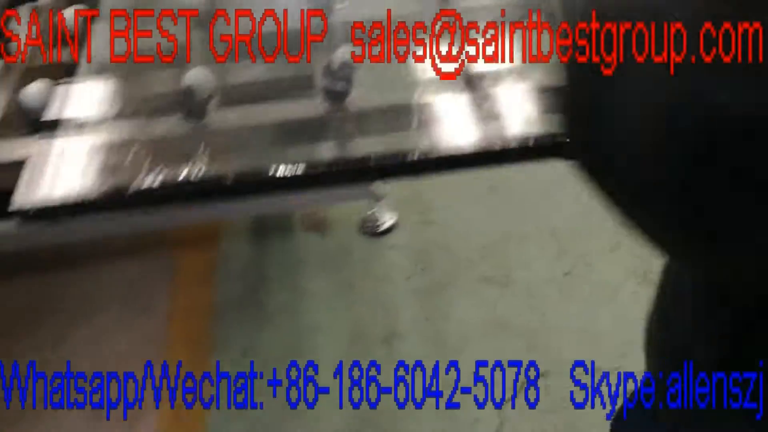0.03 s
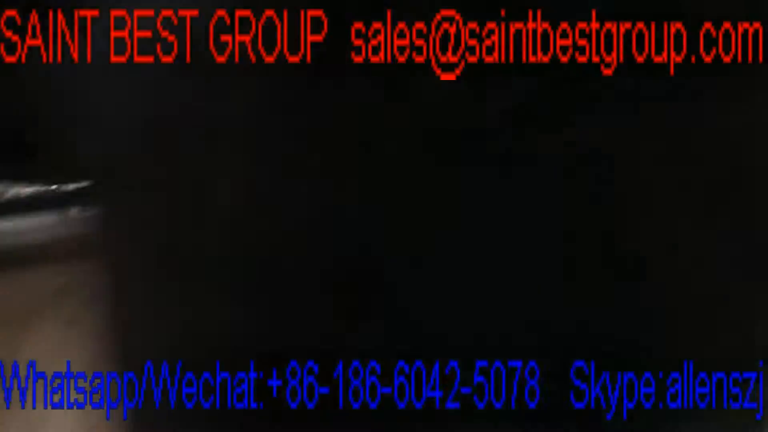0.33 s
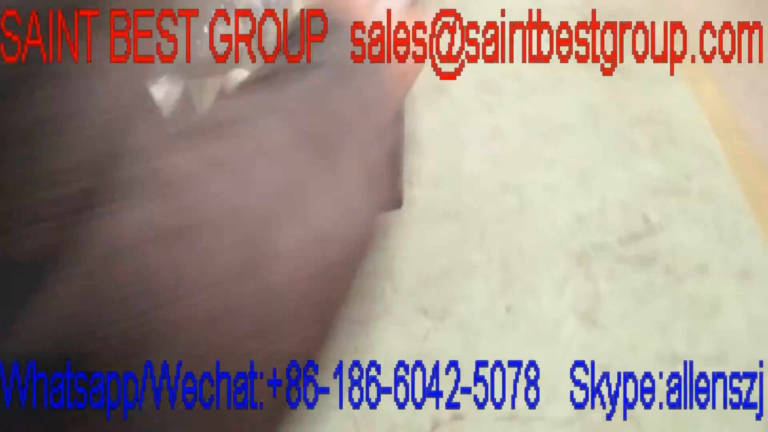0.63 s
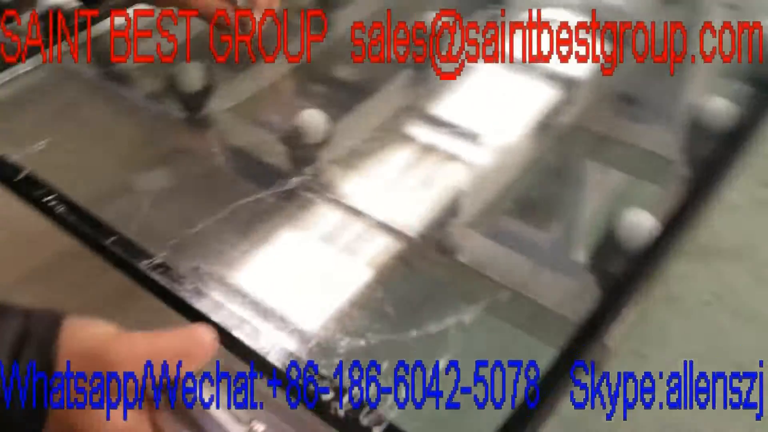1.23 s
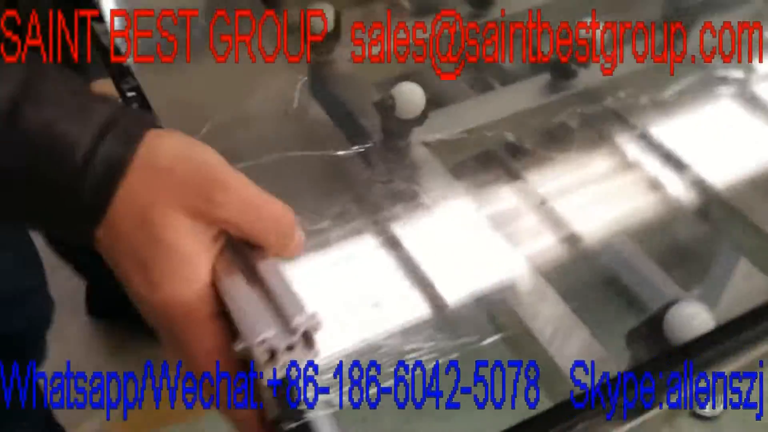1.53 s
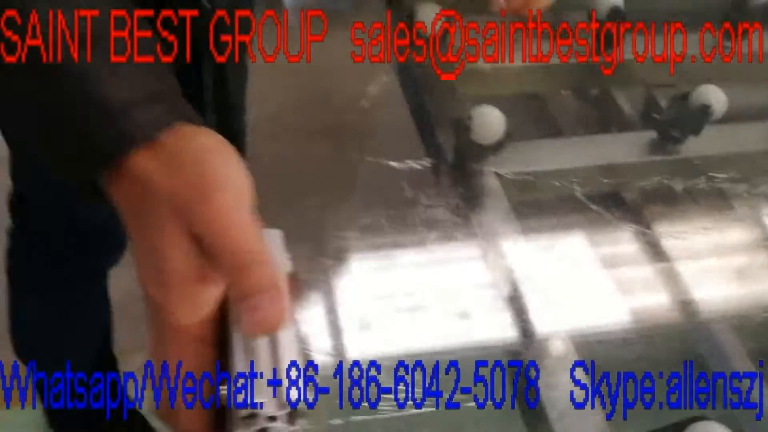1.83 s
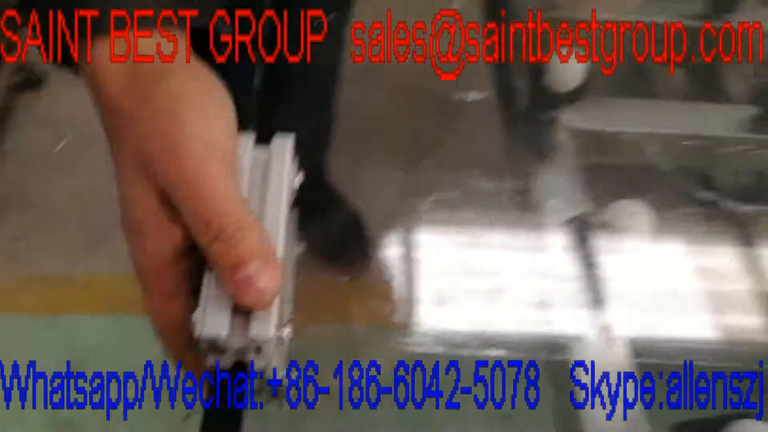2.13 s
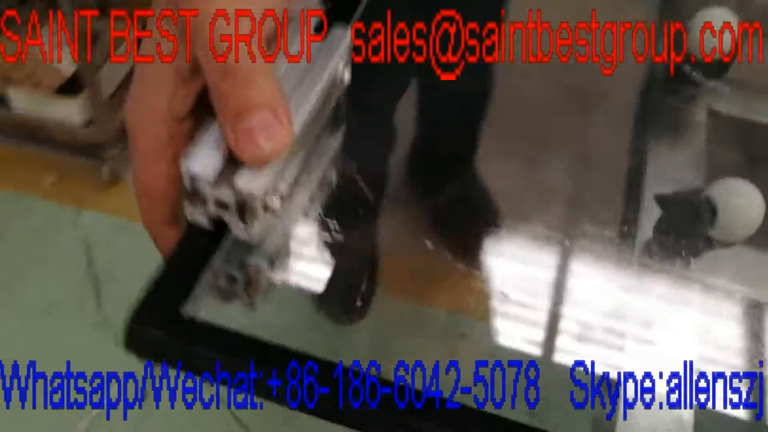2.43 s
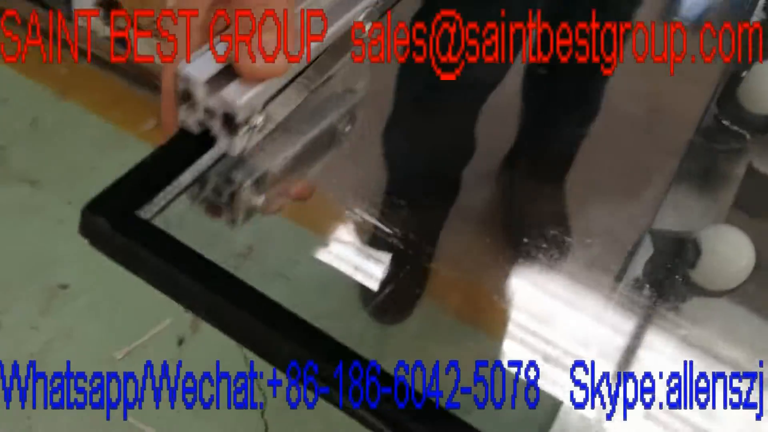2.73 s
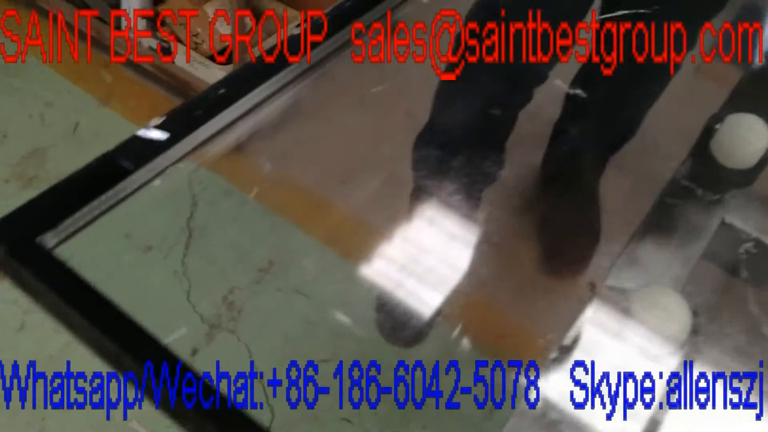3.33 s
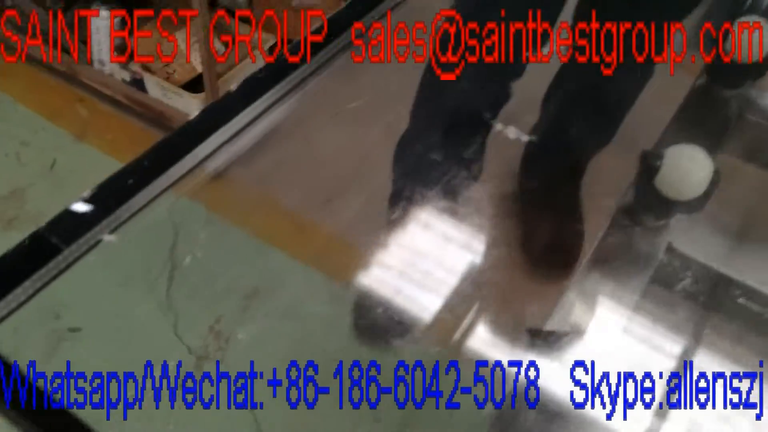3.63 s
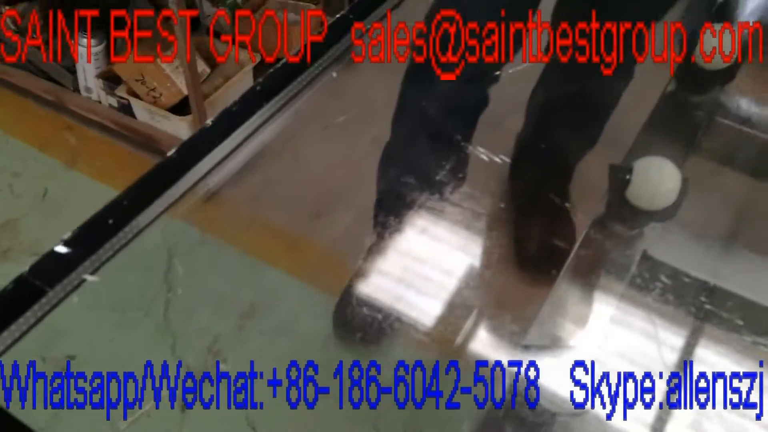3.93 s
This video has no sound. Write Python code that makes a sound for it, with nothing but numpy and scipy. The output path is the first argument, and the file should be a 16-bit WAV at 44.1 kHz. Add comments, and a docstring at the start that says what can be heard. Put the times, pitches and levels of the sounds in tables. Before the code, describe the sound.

Sharp clacks and a gritty slide of an aluminium bar on glass in a large hall.

```python
"""Aluminium bar on a glass pane

A short aluminium bar is handled on a framed glass pane lying on a table in a large, quiet workshop.
A machine drones, metal clinks far off and a sleeve brushes past. The bar clacks onto the glass, making
the pane thud, then scuffs and slides along the edge, squeaking and catching on grit. It comes off
with a loud double clack that rings through the hall."""
import sys
import numpy as np
from scipy import signal
from scipy.fft import rfft, irfft, next_fast_len
from scipy.io import wavfile

SR = 44100
rng = np.random.default_rng(int(sys.argv[2]) if len(sys.argv) > 2 else 0)


def dump(signal):
    """Clip the signal to [-1, 1] and save it as 16-bit WAV at the path in sys.argv[1]."""
    limited = np.clip(np.atleast_2d(signal).T, -1, 1)
    pcm = np.round(limited * 32767).astype(np.int16)
    wavfile.write(sys.argv[1], SR, pcm)


N = 176400
T = np.arange(N) / SR
SIDES = np.array([[1], [-1]])  # left, right

# tone colour of the bar chattering on glass: (frequency [Hz], level [dB])
CHATTER_COLOUR = [(400, -16), (720, -10), (1150, -2), (2100, 2.5), (4000, -5.5), (5300, 1), (6600, -1.5),
                  (8300, 0.5), (10700, -13.5), (13000, -11.5), (15800, -23.5)]
# which side the sound of the hall leans to: (frequency [Hz], left minus right [dB])
HALL_LEAN = [(400, 3.5), (1000, -7), (2200, -5.5), (4000, -1), (8000, 6.5), (13000, -13)]
# how alike both ears hear nearby noise: (frequency [Hz], likeness [0 to 1])
NEAR_EAR_LIKENESS = [(200, 1), (800, 0.39), (2000, 0.15)]
# how alike both ears hear distant noise: (frequency [Hz], likeness [0 to 1])
FAR_EAR_LIKENESS = [(100, .97), (300, 0.92), (800, 0)]


def from_db(db):
    """Turns decibels into a factor to multiply a sound by."""
    return 10 ** (np.asarray(db) / 20)


def rms_one(x):
    """Scales a sound to an average power of one."""
    return x / np.sqrt(np.mean(x ** 2) + 1e-20)


def at_hz(points, hz):
    """Reads a table of (frequency, value) between its rows."""
    frequencies, values = np.transpose(points)
    return np.interp(np.log(hz + 1), np.log(frequencies), values)


def level(curve):
    """Strength that follows a table of (time, level), silent outside it."""
    s, db = np.transpose(curve)
    return from_db(np.interp(T, s, db)) * (T >= s[0]) * (T <= s[-1])


def fade(t, t60_s):
    """Full strength until t = 0, then a drop of 60 dB every t60_s seconds."""
    return from_db(-60 * np.maximum(t, 0) / t60_s)


def wander(changes_per_s):
    """A random line that takes a new value so many times a second."""
    return np.interp(T * changes_per_s, np.arange(4000), rng.standard_normal(4000))


def bell(hz, centre_hz, width_hz):
    """How strongly a resonance answers each frequency: most at its centre."""
    return 1 / np.sqrt(1 + (2 * (hz - centre_hz) / width_hz) ** 2)


def add(out, s, x):
    """Mixes x into out, starting at s seconds."""
    start = int(s * SR)
    out[:, start:start + x.shape[1]] += x[:, :N - start]


def shape(x, db_at):
    """Turns each frequency up or down by db_at(Hz), with no ringing ahead of a hit (minimum phase)."""
    n = 2 * next_fast_len(x.shape[-1] * 3 // 5)
    gains = from_db(db_at(np.fft.rfftfreq(n, 1 / SR)))
    cepstrum = irfft(np.log(gains), n)
    # keeping only the first half makes the filter respond after the sound, never before
    response = np.exp(rfft(2 * cepstrum[..., :n // 2], n) - cepstrum[..., :1])
    return irfft(rfft(x, n) * response, n)[..., :x.shape[-1]]


def colour(x, spectrum, extra_db=lambda hz: 0):
    """Gives white noise a tone colour and keeps its power."""
    return shape(x, lambda hz: 20 * np.log10(rms_one(from_db(at_hz(spectrum, hz) + extra_db(hz)))))


def place(x, lean):
    """Leans each frequency to the left or right."""
    return shape(x, lambda hz: at_hz(lean, hz) * SIDES / 2)


def noise(likeness, size=N):
    """White stereo noise whose two sides are most alike in the bass."""
    common, opposite = rfft(rng.standard_normal((2, size)))
    alike = np.clip(at_hz(likeness, np.fft.rfftfreq(size, 1 / SR)), -.99, .99)
    return irfft(np.sqrt(1 + alike) * common + np.sqrt(1 - alike) * opposite * SIDES, size)


def narrow_noise(centre_hz, width_hz):
    """Steady, distant noise gathered around one pitch."""
    resonance = bell(np.fft.rfftfreq(N, 1 / SR), centre_hz, width_hz) ** 2
    return rms_one(irfft(rfft(noise(FAR_EAR_LIKENESS)) * resonance, N))


def friction(grain_db, grains_per_s):
    """Noise whose strength jumps from one tiny slip to the next."""
    slip_number = np.cumsum(rng.random(N) < grains_per_s / SR)
    hiss = noise(NEAR_EAR_LIKENESS)
    strengths = from_db(grain_db * rng.standard_normal(N + 1))
    return rms_one(hiss * strengths[slip_number])


def patchy(x, depth_db, changes_per_s):
    """Each band of frequencies swells and fades on its own as the contact shifts."""
    hz, spectrum = np.fft.rfftfreq(N, 1 / SR), rfft(x)
    edges = [0, *np.geomspace(500, 16000, 16), SR]
    bands = (irfft(spectrum * (hz >= lo) * (hz < hi), N) for lo, hi in zip(edges, edges[1:]))
    return rms_one(sum(band * from_db(depth_db * wander(changes_per_s)) for band in bands))


def burst(rise_s, hold_s, t60_s, touches_per_s=2200, uneven_db=4.5):
    """Many tiny, uneven touches make a noise that rises fast and fades after hold_s."""
    t = T[:SR // 2]
    touch_number = np.cumsum(rng.random(len(t)) < touches_per_s / SR)
    strengths = from_db(uneven_db * np.clip(rng.standard_normal(len(t) + 1), -2, 2))
    chatter = noise(NEAR_EAR_LIKENESS, size=len(t)) * rms_one(strengths[touch_number])
    return chatter * np.minimum(t / rise_s, 1) * fade(t - hold_s, t60_s)


def ping(hz, t60_s):
    """One fading tone that swells over its first cycle, the same at both ears."""
    t = T[:SR // 2]
    tone = np.sin(2 * np.pi * hz * t) * np.minimum(t * hz, 1) * fade(t, t60_s)
    return np.tile(tone, (2, 1))


def ring(tones, t60_s, phase_spread, detune_share=0, rise_s=0.004):
    """A struck object rings with its natural tones, a little differently on each blow and at each ear."""
    t = T[:SR // 2]
    out = 0
    for hz, db in tones:
        strength = from_db(db + rng.normal())
        tuned_hz = hz * (1 + detune_share * rng.normal())
        ear_phases = phase_spread * rng.normal(size=(2, 1))
        out = out + strength * np.sin(2 * np.pi * tuned_hz * t + ear_phases)
    return out * np.minimum(t / rise_s, 1) * fade(t, t60_s)


def background():
    """The soft rush of air, a droning machine and metal clinking far off."""
    # tone colour of the air: (frequency [Hz], level [dB])
    air_colour = [(25, -1), (100, 1), (260, 7.5), (450, -5.5), (1700, -1.5), (3000, -33), (6500, -13.5),
                  (8400, -7), (10600, -15), (15500, -22)]
    # loudness of the machine: (time [s], level [dB])
    drone_levels = [(0, -62.5), (.45, -52), (.8, -68.5), (4, -69.5)]
    # distant clinks: (time [s], pitch [Hz], level [dB])
    clinks = [(.06, 2070, -48.5), (0.162, 2254, -42.5)]
    out = from_db(-60.5) * colour(noise(FAR_EAR_LIKENESS), air_colour)
    out += level(drone_levels) * narrow_noise(centre_hz=229.7, width_hz=5.1)
    for s, hz, db in clinks:
        metal = place(narrow_noise(hz, width_hz=220), HALL_LEAN)
        out += from_db(db) * fade(T - s, t60_s=0.37) * (T >= s) * metal
    return out


def hall(x, build_s=0.0037):
    """The hall's echoes blur into a tail that builds up quickly and lasts longest near 250 Hz."""
    # how long the echo lasts: (frequency [Hz], time to fade by 60 dB [s])
    fade_times = [(100, 0.38), (250, 2.1), (1000, 0.75), (4000, 1.1), (5500, 0.61), (8000, 0.65),
                  (15000, 0.49)]
    # tone colour of the echo: (frequency [Hz], level [dB])
    echo_colour = [(350, -7.5), (700, -2), (1400, -3), (2100, 0.5), (2600, -2.5), (3100, -1), (4000, -2),
                   (5000, -8.5), (8000, -8), (14000, -7.5)]
    t, hz = T[:SR], np.fft.rfftfreq(SR, 1 / SR)
    spectrum = rfft(noise(FAR_EAR_LIKENESS, size=SR))
    edges = np.geomspace(40, 18000, 17)
    tail = 0
    for lo, hi in zip(edges, edges[1:]):
        band = irfft(spectrum * (hz >= lo) * (hz < hi), SR)
        tail = tail + band * fade(t, at_hz(fade_times, np.sqrt(lo * hi)))
    tail = rms_one(tail * (1 - np.exp(-t / build_s))) / np.sqrt(SR)
    tail = shape(tail, lambda f: at_hz(echo_colour, f))
    return place(signal.fftconvolve(x, tail, axes=1)[:, :N], HALL_LEAN)


def sleeve():
    """Cloth brushes past with a fine-grained hiss whose colour keeps shifting."""
    # rise and fall of the brushing: (time [s], level [dB])
    brush_levels = [(0, -65.5), (.33, -59), (.39, -45.5), (.5, -48), (.59, -38), (.635, -40.5), (.695, -36),
                    (.73, -46.5), (.87, -54.5), (1.0, -51), (1.07, -102), (1.35, -52.5), (1.55, -59),
                    (1.95, -66), (2.07, -56.5), (2.16, -64.5)]
    # tone colour of the cloth: (frequency [Hz], level [dB])
    cloth_colour = [(30, -33), (80, -9), (250, -9), (440, -17.5), (1000, -9.5), (1700, -3.5), (6500, -8.5),
                    (8200, -4.5), (10200, -14.5), (13000, -14.5), (15500, -33)]
    hiss = patchy(friction(grain_db=2.16, grains_per_s=500), depth_db=3.0, changes_per_s=25.7)
    return colour(hiss * level(brush_levels), cloth_colour)


def knocks():
    """Dull knocks on the frame and table each ring briefly at the pitch of the spot that is hit; two low, brief
    tones also open the rubbing along the edge."""
    # the knocks, then two low tones as the rubbing starts: (time [s], pitch [Hz], level [dB], time to fade by
    # 60 dB [s])
    blows = [(0.607, 265, -27.5, 0.072), (0.895, 980, -35, 0.034), (.947, 850, -29, 0.016),
             (2.161, 1235, -40, 0.023), (2.535, 485, -44, 0.1), (2.571, 750, -38.5, 0.034)]
    out = np.zeros((2, N))
    for s, hz, db, t60_s in blows:
        add(out, s, from_db(db) * ping(hz, t60_s))
    return out


def thuds():
    """The pane is pushed onto its supports: its low tones ring and the table bumps."""
    # pushes on the pane: (time [s], level [dB])
    pushes = [(0.601, -42), (0.949, -38.5), (1.007, -46), (1.404, -41.5), (1.676, -36), (3.305, -43),
              (3.342, -37.5)]
    # low natural tones of the pane: (frequency [Hz], level [dB])
    pane_tones = [(88, -7.5), (152, -4.5), (188, 5.5), (238, -5.5), (290, -18)]
    # tone colour of the table's bump: (frequency [Hz], level [dB])
    bump_colour = [(25, -55), (70, -28.5), (170, 0.5), (300, -2.5), (600, -7.5), (1500, -29.5)]
    out = np.zeros((2, N))
    for s, db in pushes:
        bump = from_db(-11.5) * colour(burst(rise_s=0.004, hold_s=0.0043, t60_s=0.38), bump_colour)
        pane = ring(pane_tones, t60_s=0.24, phase_spread=0.074)
        add(out, s, from_db(db) * (pane + bump))
    return out


def rattles():
    """The bar rocks on the pane with a light chatter, each time around a different pitch."""
    # rocking movements: (time [s], centre pitch [Hz], level [dB])
    rocks = [(1.15, 1900, -31.5), (1.482, 1690, -40.5), (1.553, 1150, -41.5), (1.836, 1850, -39)]
    out = np.zeros((2, N))
    for s, centre_hz, db in rocks:
        resonance_db = lambda hz: 20 * np.log10(bell(hz, centre_hz, width_hz=centre_hz))
        chatter = burst(rise_s=0.0014, hold_s=0.0073, t60_s=0.04)
        add(out, s, from_db(db) * colour(chatter, CHATTER_COLOUR, resonance_db))
    return out


def squeaks(waver_share=0.04, rough_db=4, wavers_per_s=500):
    """The bar sticks and slips, making short, scratchy notes unsteady in pitch and strength."""
    # the squeaks: (time of the middle [s], pitch [Hz], level [dB], length [s])
    notes = [(.382, 3220, -41, 0.017), (0.431, 3294, -34.5, 0.0091), (0.901, 5330, -27, 0.0018),
             (1.341, 5270, -33.5, 0.015), (1.367, 1860, -46, 0.032), (2.517, 1694, -40.5, 0.03),
             (2.725, 1200, -39.5, 0.053), (3.208, 5320, -43.5, 0.019), (3.963, 1477, -39.5, 0.014)]
    out = 0
    for s, hz, db, length_s in notes:
        cycles = np.cumsum(hz * (1 + waver_share * wander(wavers_per_s))) / SR
        note = np.sin(2 * np.pi * cycles) * from_db(rough_db * wander(wavers_per_s))
        swell = np.exp(-2 * ((T - s) / length_s) ** 2)
        out = out + from_db(db) * swell * rms_one(note)
    return out


def slide():
    """The bar scuffs, then rubs along the edge, catching on grit and snapping free."""
    # rise and fall of the rubbing: (time [s], level [dB])
    rub_levels = [(2.33, -44), (2.42, -49.5), (2.52, -38), (2.62, -38), (2.85, -36), (3.0, -35.5),
                  (3.12, -36.5), (3.17, -44), (3.25, -62)]
    # tone colour of the rubbing: (frequency [Hz], level [dB])
    rub_colour = [(100, -27), (400, -8.5), (900, 0.5), (1700, 2.5), (2300, 0.5), (4000, -4), (8600, -2.5),
                  (10000, -16.5), (13000, -16), (16000, -39)]
    # narrow pitches that the rubbing sets ringing: (frequency [Hz], width [Hz], boost [dB])
    resonances = [(3250, 61, 4), (5050, 160, 5.5), (7370, 120, 13), (8670, 130, 3)]
    # rise and fall of the opening scuff: (time [s], level [dB])
    scuff_levels = [(2.225, -51), (2.25, -46.5), (2.262, -32.5), (2.285, -27.5), (2.315, -34),
                    (2.345, -40.5), (2.4, -85)]
    # tone colour of the scuff: (frequency [Hz], level [dB])
    scuff_colour = [(240, -80), (400, -32), (1000, -15), (2250, 0.5), (2430, -5), (2670, -4.5),
                    (2920, -9.5), (9070, -14), (15500, -29)]
    # moments when the bar catches: (time [s], level [dB])
    catches = [(2.534, -38.5), (2.57, -45), (2.602, -40), (2.756, -29), (2.8, -45), (2.822, -35.5),
               (2.8623, -25), (2.8878, -28), (2.942, -27), (2.965, -35), (3.004, -39.5), (3.064, -31),
               (3.074, -34), (3.082, -30), (3.119, -34.5)]
    # tone colour of the grit: (frequency [Hz], level [dB])
    grit_colour = [(400, -41), (800, 2), (1300, 2), (1800, 6), (2600, 3), (3300, 0), (4500, -10),
                   (8000, -24), (15000, -40)]
    boost_db = lambda hz: sum(db * bell(hz, centre, width) ** 2 for centre, width, db in resonances)
    rub = patchy(friction(grain_db=2.0, grains_per_s=210), depth_db=3.0, changes_per_s=35)
    out = colour(rub * level(rub_levels), rub_colour, boost_db)
    out += colour(friction(grain_db=2.5, grains_per_s=1500) * level(scuff_levels), scuff_colour)
    for s, db in catches:
        snap_hz = 1650 * 2 ** (rng.normal() / 10)
        snap = from_db(9) * ping(snap_hz, t60_s=0.016)
        grit = from_db(-1) * colour(burst(rise_s=0.0005, hold_s=0.003, t60_s=0.045), grit_colour)
        add(out, s, from_db(db) * (snap + grit))
    return out


def clacks(lift_s=3.341):
    """The bar chatters on the glass and rings briefly; returns the near sound and the hall's share."""
    # the bar meets the glass: (time [s], level [dB], chatter length [s], brightness [dB per octave],
    # boost of the highest treble [dB], share sent into the hall [dB])
    contacts = [(0.374, -39, 0.0039, -2.5, -16, -23), (0.61, -33, 0.0018, -6.5, 6, 8.5),
                (0.895, -35, 0.0096, -2.5, -5, -4), (0.937, -40.5, 0.0057, -2, -8, -18),
                (1.089, -14.5, 0.0047, 2, -10, -6), (1.205, -30.5, 0.00088, -0.5, 0, -5),
                (1.242, -38, 0.00085, -1.5, 1, -15), (1.335, -32, 0.0018, -0.5, -8, -7),
                (1.341, -30.5, 0.0011, -3, 2, 5.5), (1.394, -27.5, 0.005, -1.5, 0, -28),
                (1.615, -40, 0.031, 7.5, 1, 2), (1.667, -13.5, 0.0069, 0.5, 3, -7.5),
                (1.692, -26, 0.00028, 3, -13, 1), (2.313, -39, 0.00036, 1.5, -6, 9.5),
                (3.3005, -21, 0.0074, 3.5, -4, -19), (3.337, -10, 0.007, 1.1, -4, -1),
                (3.9551, -32, 0.0052, 3.5, 6.5, 5.5)]
    # natural tones of the bar: (frequency [Hz], level [dB])
    bar_tones = [(1414, -11), (2079, -9), (2413, -16), (3022, -14), (3980, -9), (5022, -15), (5115, -13),
                 (5510, -11), (5945, -13), (8090, -12), (8430, -16)]
    near, to_hall = np.zeros((2, 2, N))
    for s, db, chatter_s, bright_db, top_db, hall_db in contacts:
        hardness_db = lambda hz: (bright_db * np.log2(np.maximum(hz, 500) / 4000)
                                  + top_db * at_hz([(9500, 0), (12000, 1)], hz))
        touches = burst(rise_s=chatter_s, hold_s=chatter_s, t60_s=0.04)
        chatter = colour(touches, CHATTER_COLOUR, hardness_db)
        # each grip and contact shifts the bar's tones a little
        bar = ring(bar_tones, t60_s=0.08, phase_spread=3.57, detune_share=0.009)
        hit = from_db(db) * (from_db(-1.5) * chatter + from_db(-4) * bar)
        add(near, s, hit)
        add(to_hall, s, from_db(hall_db) * hit)
    # lifted clear of the pane, the bar rings on for longer
    add(near, lift_s, from_db(-50) * ring(bar_tones, t60_s=0.7, phase_spread=np.pi))
    return near, to_hall


def scene():
    """Mixes the nearby bar, pane and sleeve with their echo and the background."""
    # which side the bar and pane lean to: (frequency [Hz], left minus right [dB])
    near_lean = [(250, -0.5), (1000, -3.5), (2000, -12), (3000, 1), (5100, -7.5), (6800, 0.5), (8500, 9),
                 (10500, 4), (13000, -19), (15500, 5)]
    # which side the sleeve leans to: (frequency [Hz], left minus right [dB])
    sleeve_lean = [(300, 2), (1000, -2.5), (2400, -6.5), (6000, 0), (9000, 9), (14000, -16.5)]
    hits, hits_to_hall = clacks()
    bumps = thuds() + knocks()
    rubbing = slide() + squeaks() + rattles()
    cloth = sleeve()
    near = place(hits + bumps + from_db(-2.5) * rubbing, near_lean)
    near += from_db(4.5) * place(cloth, sleeve_lean)
    to_hall = hits_to_hall + from_db(-11) * (bumps + rubbing) + from_db(-8) * cloth
    return near + hall(to_hall) + background()


def record(dry):
    """Rounds off the highest peaks and cuts the very top of the treble."""
    treble_cut = signal.cheby2(14, 60, 16700, fs=SR, output="sos")  # 60 dB down from 16700 Hz up
    return signal.sosfilt(treble_cut, np.tanh(dry))


dry = scene()
out = record(dry)
dump(out)
```